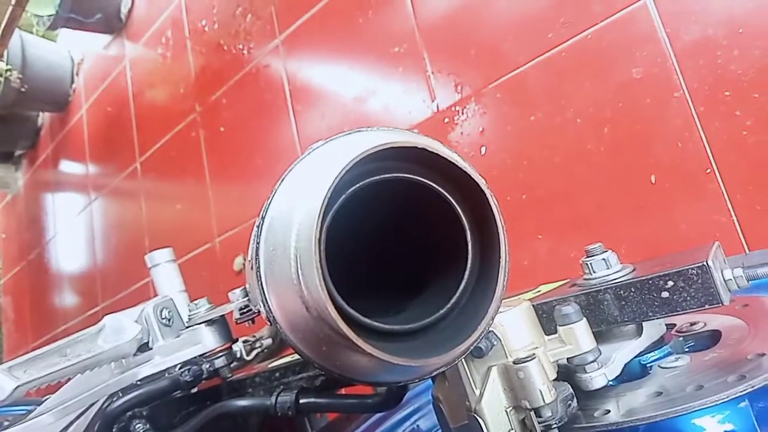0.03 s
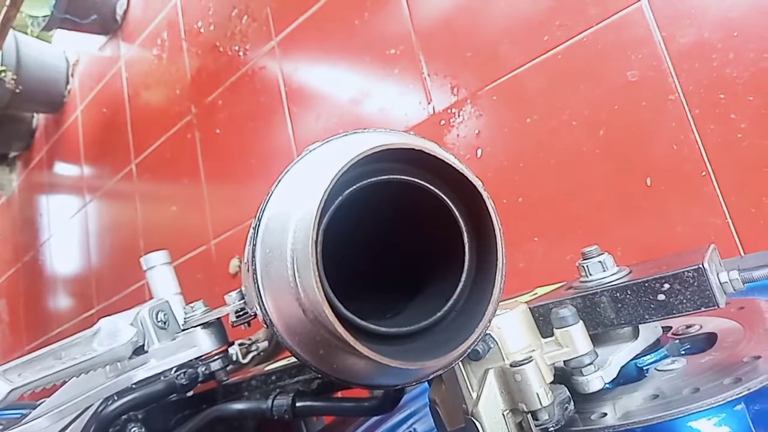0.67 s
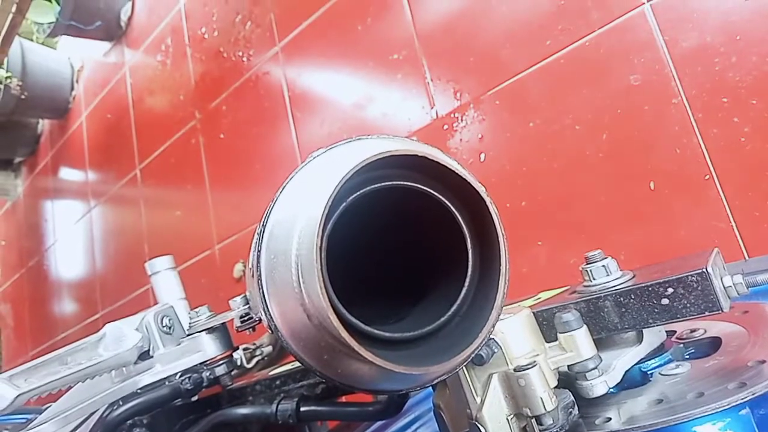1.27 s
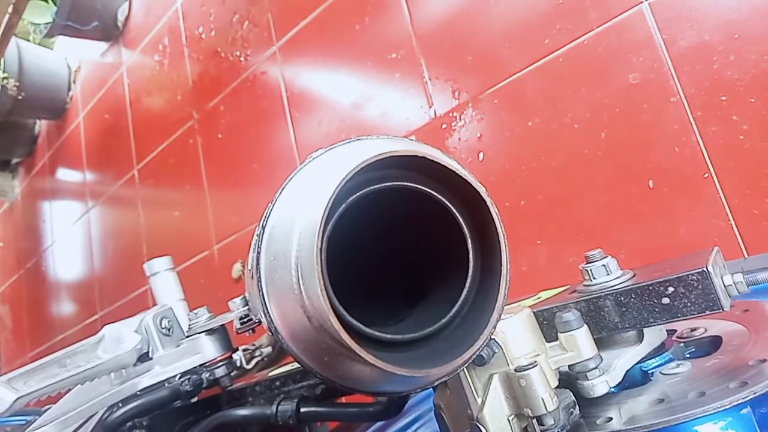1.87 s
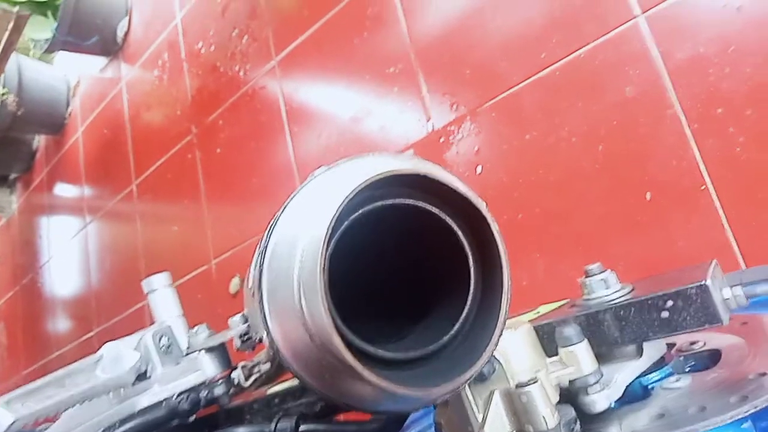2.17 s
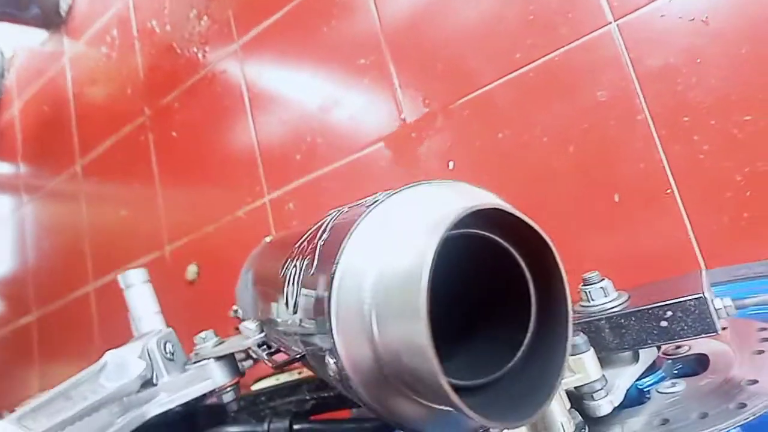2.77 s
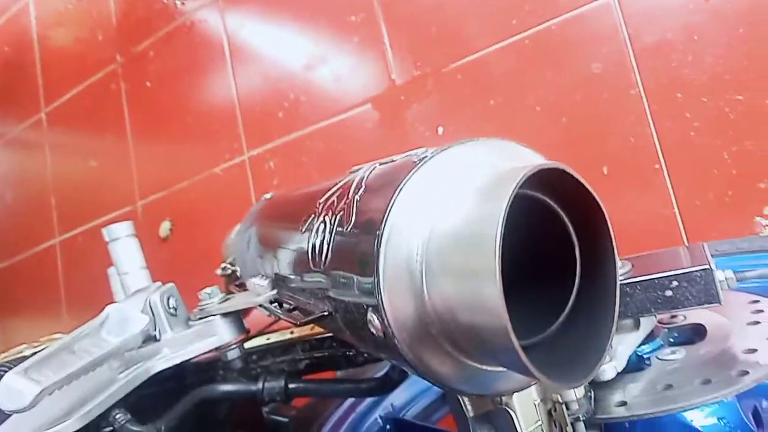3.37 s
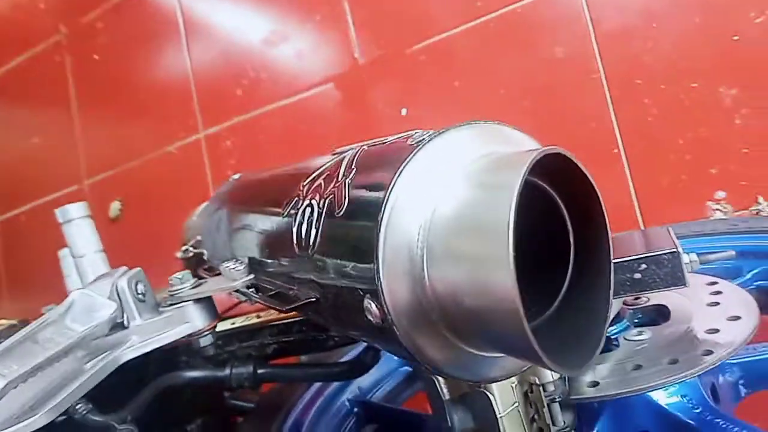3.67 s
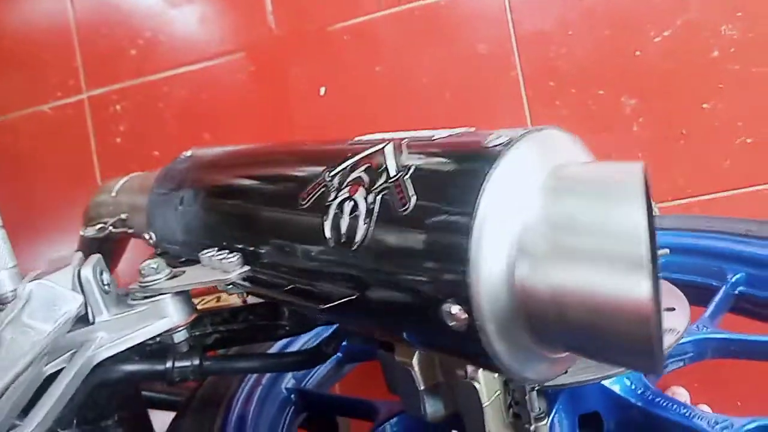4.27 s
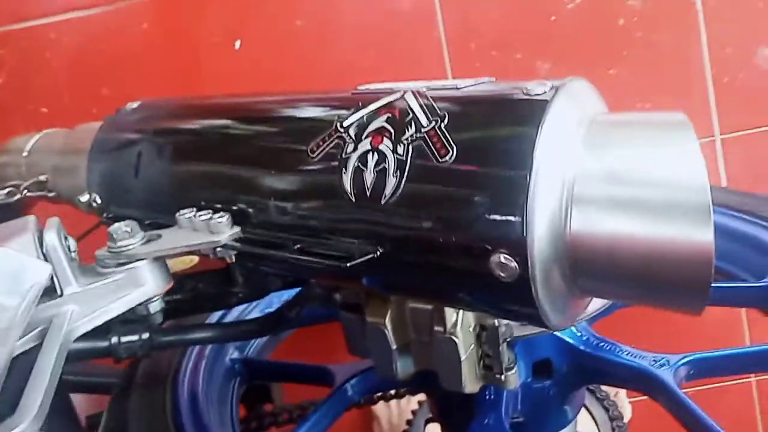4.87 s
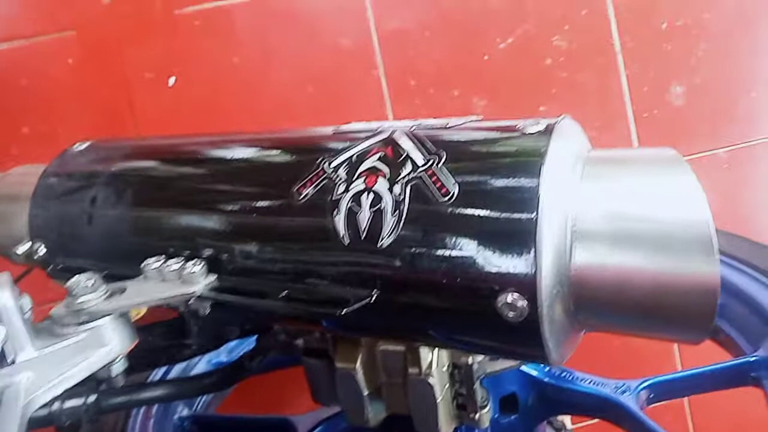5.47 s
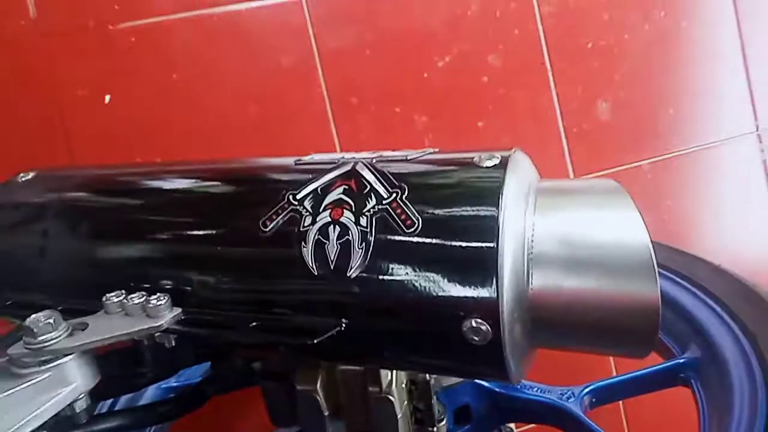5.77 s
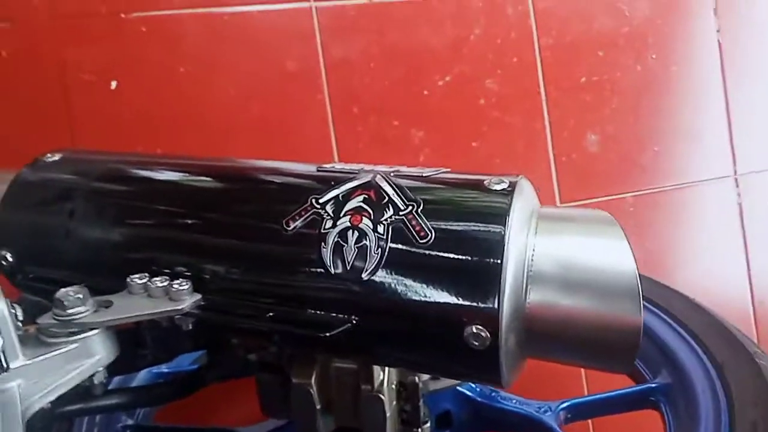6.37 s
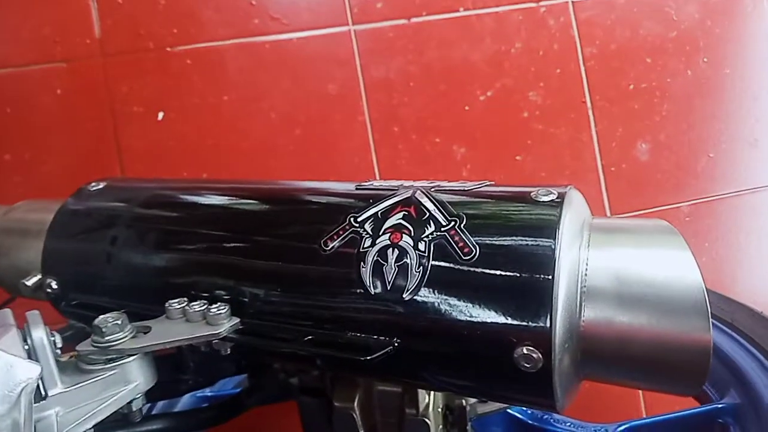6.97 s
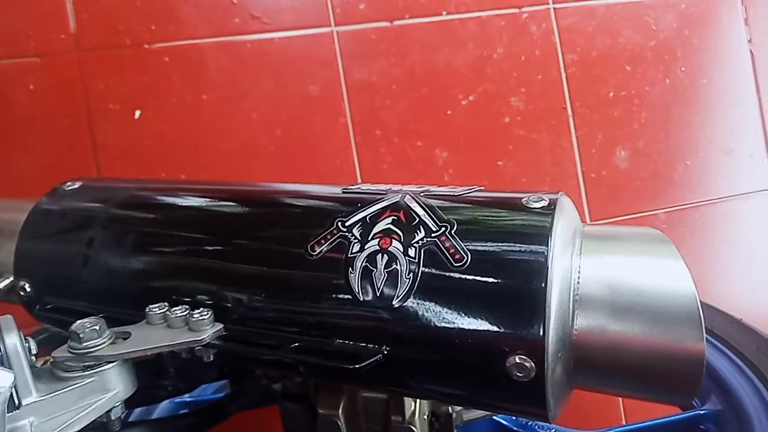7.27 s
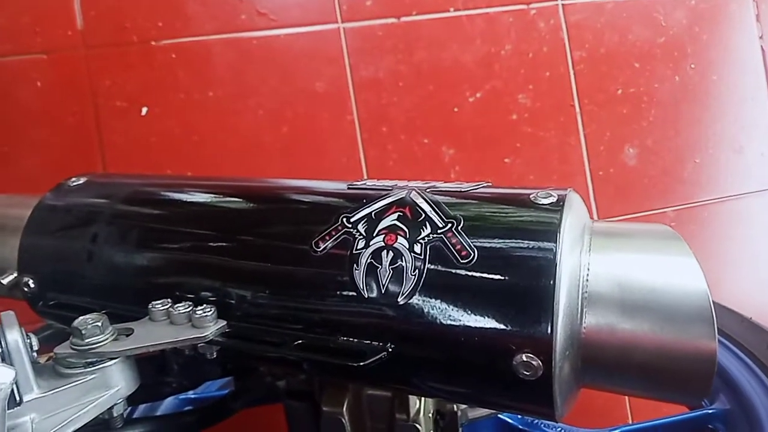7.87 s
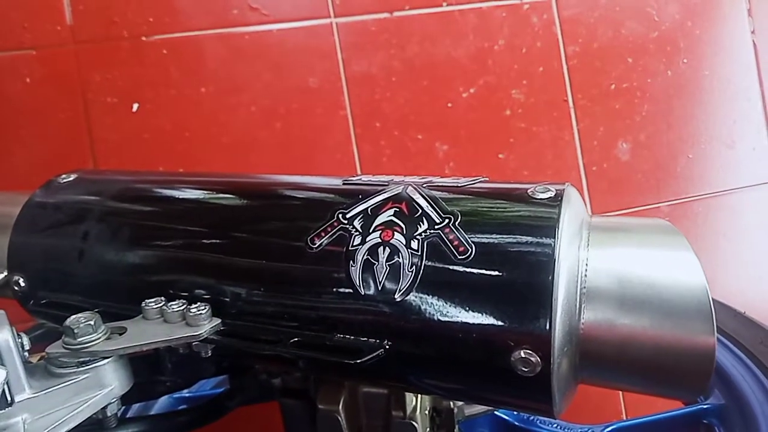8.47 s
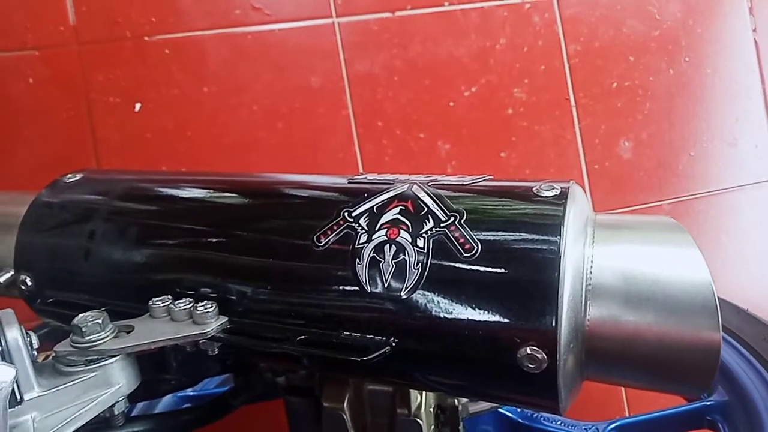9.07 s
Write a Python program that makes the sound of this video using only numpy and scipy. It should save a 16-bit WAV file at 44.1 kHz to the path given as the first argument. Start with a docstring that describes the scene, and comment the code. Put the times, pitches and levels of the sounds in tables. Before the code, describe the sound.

Close to the muffler, an idling motorcycle engine burbles and pops in a lumpy rhythm over faint mechanical ticking.

```python
"""A single-cylinder four-stroke motorcycle idles on a tiled floor, a phone close to the muffler's mouth.
From the start mostly every second cycle fires: a firing blows a hard pulse into the pipe, a miss sucks
a softer one back; gas cracks at the outlet and the valve gear ticks and whirs. From about 2 to 4 s the
microphone crosses the jet and puffs strike it. Between 4 and 5 s the engine briefly catches on every
cycle, with a few faint squeaks. By 6 s the phone is beside the muffler, where the crack is duller."""
import sys
import numpy as np
from scipy import signal
from scipy.fft import rfft, irfft, next_fast_len
from scipy.io import wavfile

SR = 44100
rng = np.random.default_rng(int(sys.argv[2]) if len(sys.argv) > 2 else 0)


def file_out(sig):
    """Save sig as 16-bit WAV at sys.argv[1]."""
    # one column per channel
    cols = np.atleast_2d(sig).T
    # limit, then scale
    lim = np.clip(cols, -1, 1)
    pcm = np.round(lim * 32767).astype(np.int16)
    wavfile.write(sys.argv[1], SR, pcm)


N = 402633
TIME = np.arange(N) / SR
FFT_SIZE = next_fast_len(N + SR)
HZ = np.arange(FFT_SIZE // 2 + 1) * SR / FFT_SIZE


def undb(db):
    """Decibels to gain."""
    return 10 ** (np.asarray(db) / 20)


def unit(x):
    """Scale to rms 1."""
    return x / np.sqrt(np.mean(x ** 2))


def shaped(x, response):
    """Filter by a frequency response."""
    return irfft(rfft(x, FFT_SIZE) * response, FFT_SIZE)[:N]


def band(hz, width, axis=HZ):
    """Response of one resonance, gain 1 at its centre."""
    return 1j * axis * width / (hz ** 2 - axis ** 2 + 1j * axis * width)


def low(hz, axis=HZ):
    """Response of a one-pole low-pass."""
    return 1 / (1 + 1j * axis / hz)


def noise(response):
    """Filtered noise of rms 1."""
    return unit(shaped(rng.standard_normal(N), response))


def coloured(points):
    """Noise of rms 1 with the colour of (Hz, dB) points."""
    hz, db = np.transpose(points)
    return noise(undb(np.interp(np.log(HZ + 1), np.log(hz), db)))


def bumps(times, sizes, width_s):
    """A bell-shaped push at each time."""
    out = np.zeros(N)
    for t, size, width in np.broadcast(times, sizes, width_s):
        near = slice(*np.searchsorted(TIME, [t - 5 * width, t + 5 * width]))
        out[near] += size * np.exp(-.5 * ((TIME[near] - t) / width) ** 2)
    return out


def scatter(times, spread_db):
    """A chance gain for each event."""
    return undb(spread_db * rng.standard_normal(len(times)))


# The idle hunts in quick surges and slow sags. Each row: time in seconds, crank speed in rpm.
IDLE_SPEED = [(0.0, 1476.0), (0.6, 1420.0), (0.84, 1556.0), (1.67, 1445.0), (2.3, 1451.0), (2.67, 1572.0),
              (2.83, 1490.0), (3.68, 1497.0), (3.82, 1538.0), (4.38, 1458.0), (4.45, 1540.0), (5.0, 1452.0),
              (5.07, 1518.0), (5.58, 1434.0), (5.81, 1497.0), (7.07, 1447.0), (7.19, 1548.0), (7.9, 1433.0),
              (8.03, 1557.0), (8.53, 1433.0), (8.79, 1524.0), (9.13, 1375.0)]
# Spells in which the engine catches on every cycle. Each row: start and end in seconds.
CATCHES = [(4.2, 4.28), (4.45, 4.92)]

def engine_cycles(first_s=.048):
    """One cycle per two crank turns: its time, its rpm above the mean, and whether it fires."""
    rpm = np.interp(TIME, *np.transpose(IDLE_SPEED))
    phase = np.cumsum(rpm / 60 / 2) / SR
    phase -= np.interp(first_s, TIME, phase)
    times = np.interp(np.arange(int(phase[-1]) + 1), phase, TIME)
    fires = [False]
    for t in times[1:]:
        fires.append(not fires[-1] or any(start < t < end for start, end in CATCHES))
    return times, np.interp(times, TIME, rpm - rpm.mean()), np.array(fires)


# The gas crack swells and eases. Each row: time in seconds, relative level in dB.
CRACK_LEVEL = [(0, .7), (.8, 2), (.95, 5.5), (3.2, 4), (3.9, 6.5), (4.3, 2.1), (5.3, 3.2), (6, 1),
               (9.13, 0.8)]

def firings(times, surge_rpm, fires, db_per_rpm=0.0085, refire_db=-3.5):
    """A firing cracks harder with speed, and less right after another, when no unburnt charge is left."""
    db = np.interp(times, *np.transpose(CRACK_LEVEL)) + db_per_rpm * surge_rpm
    db += refire_db * np.roll(fires, 1)
    db += 0.23 * rng.standard_normal(len(times))
    return times[fires], undb(db[fires])


# Partial burns leave less vacuum and weaken the gulp. Each row: time in seconds, change in dB.
PARTIAL_BURNS = [(.05, -15), (.21, -13.5), (1.67, -2.7), (2.49, -4.5), (3.12, -4), (5.78, -3.5), (6.1, -5),
                 (6.75, -2.5), (6.92, -3.1), (7.24, -8), (7.56, -6.5), (7.89, -2.5), (9.02, -3.8)]

def misfires(times, surge_rpm, fires, lead_s=.0033, base_db=1, db_per_rpm=0.0266):
    """An unfired cycle gulps a little ahead of the beat, harder the faster the engine turns."""
    missed = times[~fires] - lead_s
    db = base_db + db_per_rpm * surge_rpm[~fires]
    for t, change_db in PARTIAL_BURNS:
        db[np.argmin(abs(missed - t))] += change_db
    return missed, undb(db)


# Resonances of header and muffler. Each row: frequency in Hz, width in Hz, gain in dB, polarity.
PIPE_MODES = [(92.8, 18.7, 4, -1), (165.9, 33.5, 6.5, -1), (194.3, 12.2, 4, 1), (280.6, 52.8, 2.5, -1),
              (352.7, 12.8, 5.5, 1), (564, 8.5, -10.5, 1), (716, 67, -2, -1)]

def exhaust(fired, missed, miss_gain, mouth_hz=105):
    """Pressure pulses at the valve ring the pipe; its open end radiates no deep bass."""
    blowdown = bumps(fired, scatter(fired, 0.5), width_s=0.00063 * scatter(fired, 0.35))
    # an unfired cylinder is below air pressure: it gulps gas back, then the piston pushes it out again
    gulp = bumps(missed, .5 * miss_gain, width_s=0.0008)
    push = bumps(missed + .0176, 0.26 * np.sqrt(miss_gain) * scatter(missed, 2), width_s=0.0026)
    # the flow is turbulent for the rest of the stroke
    stroke = bumps(np.r_[fired, missed] + 0.018, 0.74, width_s=0.01)
    eddies = undb(-25.5) * stroke * noise(low(hz=437) ** 2)
    flow = shaped(blowdown - gulp + push + eddies, low(hz=263))
    pipe = sum(np.sign(sign) * undb(db) * band(hz, width) for hz, width, db, sign in PIPE_MODES)
    pipe -= undb(-3.5) * low(hz=182)
    mouth = band(mouth_hz, mouth_hz) * 1j * HZ / mouth_hz
    return undb(4.3) * shaped(flow, pipe * mouth)


def gargle(missed, miss_gain, refired, muffler_hz=410):
    """The flow flutters as it reverses after a gulp or a hurried second firing: a throaty after-ring."""
    times = np.r_[missed + .0222, refired + .0225]
    sizes = np.r_[np.sqrt(miss_gain), np.full(len(refired), undb(-1.5))]
    jitter_s = .0007 * rng.standard_normal(len(times))
    kicks = bumps(times + jitter_s, sizes * scatter(times, 2), width_s=.0004)
    throat = band(hz=340.5, width=26) + undb(-7) * band(370.6, 19) + undb(-8) * band(228, 37)
    muffler = 1 / (1 + (HZ / muffler_hz) ** 12)
    return undb(1) * shaped(kicks, throat * muffler)


# Colour of the turbulent gas at the outlet. Each row: frequency in Hz, relative level in dB.
CRACK_COLOUR = [(300, 1.5), (650, 15.5), (900, -3.5), (1600, 2.5), (2800, -7.5), (3500, -4), (4400, -10.5),
                (5300, -23.5), (6400, -18.5), (7600, -31.5), (8500, -26.5), (9600, -41), (12000, -35),
                (15000, -33)]
# Colour of the snap of the pulse's steep front. Each row: frequency in Hz, relative level in dB.
SNAP_COLOUR = [(500, -2), (1500, 1), (3500, 0), (4400, -5.5), (5300, -17), (6400, -8), (7600, -20.5),
               (8500, -18.5), (9600, -27), (12000, -25), (15000, -24)]
# The microphone's way round the muffler. Each row: time in seconds, angle to the jet in quarter turns
# (0 is straight in front of the mouth, 1 is beside the muffler).
MIC_ANGLE = [(0, -0.18), (2.2, -0.44), (3.0, 0.061), (3.7, 0.54), (4.4, 0.4), (6, 0.92), (9.13, 0.89)]

def gas_crack(fired, force, missed, miss_gain):
    """Gas snaps and rasps as the pulse leaves, and rasps again after its round trip; a gulp hisses."""
    jet = bumps(fired - .0003, 0.71 * force, width_s=0.0014)
    jet += bumps(fired + 0.0047, 0.58 * force, width_s=0.0017)
    front = bumps(fired - .0004, 0.33 * force * scatter(fired, 1.8), width_s=.0006)
    gulp = bumps(missed + 0.002, 0.22 * miss_gain ** 2, width_s=0.005)
    turbulence = coloured(CRACK_COLOUR)
    rasp = turbulence * jet + coloured(SNAP_COLOUR) * front + shaped(turbulence * gulp, low(hz=7000))
    # the treble beams straight out of the mouth
    off_axis = abs(mic_angle())
    return undb(-28.5) * ((1 - off_axis) * rasp + off_axis * shaped(rasp, abs(low(hz=3400))))


def mic_angle():
    """The microphone's angle to the jet at every sample."""
    return np.interp(TIME, *np.transpose(MIC_ANGLE))


# Mechanical noise at the microphone. Each row: time in seconds, gain in dB.
MACHINE_LEVEL = [(0, -50), (1.9, -51.5), (4.1, -53.5), (4.9, -53), (7.2, -50.5), (8, -51), (9.13, -50)]
# The whir from behind the motorcycle and from its side. Each row: frequency in Hz, relative level in dB.
WHIR_BEHIND = [(30, -1), (200, 7), (500, 1.5), (850, -8), (1100, 4.5), (1350, -5), (1750, -10.5),
               (2200, -2.5), (2900, -10.5), (3400, -10.5), (4300, -19.5), (5200, -35), (8000, -42),
               (15000, -51.5)]
WHIR_BESIDE = [(30, -1.5), (200, 8.5), (500, -1), (850, -6.5), (1030, -1.5), (1250, -6), (1650, -1.5),
               (2400, -2.5), (2900, -10.5), (3400, -9.5), (4300, -17.5), (5200, -32.5), (8000, -35.5),
               (15000, -52)]
# Ringing of engine cases and muffler shell. Each row: frequency in Hz, width in Hz, gain in dB.
SHELL_MODES = [(1017, 66, 0), (1240, 34, -8), (1320, 47, -8), (1580, 110, -1), (2030, 12, -9),
               (2490, 25, -9), (3750, 96, -9.5), (6700, 180, 0)]

def machinery(fired, missed):
    """Cam chain and gears whir through the cases; the valve gear ticks at set points of every cycle."""
    side = np.clip(mic_angle() + 0.18, 0, 1)
    whir = np.sqrt(1 - side) * coloured(WHIR_BEHIND) + np.sqrt(side) * coloured(WHIR_BESIDE)
    beats = np.r_[fired, missed]
    # the exhaust valve knocks hardest when it opens against burnt gas
    ticks = bumps(fired - .0033, 2.4 * scatter(fired, 1), width_s=0.0028)
    ticks += bumps(beats - .013, 0.85 * scatter(beats, 2.5), width_s=0.003)
    ticks += bumps(beats + 0.043, 0.3 * scatter(beats, 7.5), width_s=0.0034)
    tappets = coloured([(300, -13.5), (700, -1), (1300, 0), (2200, -3), (4200, -24), (5200, -38.5),
                        (15000, -59.5)])
    waver = undb(noise(low(hz=25) ** 2))
    cases = 1 + sum(undb(db) * band(hz, width) for hz, width, db in SHELL_MODES)
    level = undb(np.interp(TIME, *np.transpose(MACHINE_LEVEL)))
    return level * shaped(undb(3.5) * whir * waver + undb(-0.5) * ticks * tappets, cases)


def puff(db, hz, rise_s=.0018, fall_s=.0045):
    """A ring of gas snaps on the microphone, then swirls away; the hit lies at the middle sample."""
    size, force = 4096, undb(db)
    age = (np.arange(size) - size // 2) / SR
    axis = np.arange(size // 2 + 1) * SR / size
    edge = -np.sign(age) * np.exp(-abs(age) * np.pi * hz)
    snap = irfft(rfft(edge) * abs(low(1.2 * hz, axis)) ** 2 / (1 + (axis / 3800) ** 4))
    eddy_colour = band(0.6 * hz, 0.9 * hz, axis) ** 2 * low(1900, axis) ** 3
    eddy = unit(irfft(rfft(rng.standard_normal(size)) * eddy_colour))
    swirl = eddy * np.exp(np.where(age < 0, -.5 * (age / rise_s) ** 2, -age / fall_s))
    return 1.62 * force ** 1.6 * snap / snap.max() + 0.55 * force / (1 + 2 * force) * swirl


# Puffs that hit the microphone squarely. Each row: time in seconds, strength in dB, bandwidth in Hz.
DIRECT_PUFFS = [(1.943, -17, 750), (2.443, -16.5, 660), (2.746, -16, 1010), (3.072, -14, 970),
                (3.399, -20.5, 1200), (3.547, -9.5, 687), (3.5516, -3.5, 1260), (3.7155, -15.5, 1210),
                (3.723, -9.5, 770), (3.873, -15, 1190), (3.88, -12.5, 750)]

def jet_puffs(fired, from_s=2.2, to_s=3.6, lag_s=.027, soft_db=-23, soft_hz=810):
    """Soft puffs follow the firings while the microphone crosses the jet; others hit it squarely."""
    soft = [(t + lag_s, soft_db, soft_hz) for t in fired if from_s < t < to_s]
    out = np.zeros(N)
    for t, db, hz in list(DIRECT_PUFFS) + soft:
        sound = puff(db, hz)
        start = int(t * SR) - len(sound) // 2
        out[start:start + len(sound)] += sound
    return out


def block_drone():
    """The shaking engine block drones under the pulses."""
    return undb(-41) * coloured([(20, -3), (45, -21), (90, 2.5), (180, -2), (350, -4.5), (500, -19.5),
                                 (1000, -41.5), (4000, -73)])


# Squeaks behind the engine. Each row: start in seconds, length in seconds, pitch in Hz, gain in dB.
SQUEAKS = [(.66, 0.099, 4200, -56), (4.30, 0.084, 3460, -44), (4.30, 0.13, 4170, -54.5),
           (4.46, 0.079, 4300, -49.5)]

def squeaks():
    """Narrow bands of noise swell and fade as faint, raspy high squeaks."""
    out = np.zeros(N)
    for start, length, hz, db in SQUEAKS:
        swell = bumps(start + length / 2, 0.6, width_s=length / 3)
        out += undb(db) * swell * noise(band(hz, width=310) ** 2)
    return out


def valve_ring(times):
    """The closing valve adds a faint, high metallic tick to every cycle."""
    ring = noise(band(hz=11900, width=700) ** 2)
    return undb(-82) * ring * bumps(times + .03, scatter(times, 2), width_s=0.0036)


def room(x, t60_s, wet_db):
    """The tiled room answers with a short diffuse tail, thin in the bass."""
    tail = rng.standard_normal(N) * np.exp(-np.log(1000) * TIME / t60_s) * (TIME > .006)
    response = rfft(tail / np.linalg.norm(tail), FFT_SIZE) * (1 - low(hz=304)) ** 2
    return x + undb(wet_db) * shaped(x, response)


def scene():
    """One train of engine cycles drives the pipe, the gas and the valve gear, heard in mono."""
    times, surge_rpm, fires = engine_cycles()
    fired, crack_gain = firings(times, surge_rpm, fires)
    missed, miss_gain = misfires(times, surge_rpm, fires)
    refired = times[fires & np.roll(fires, 1)]
    pulses = exhaust(fired, missed, miss_gain) + gargle(missed, miss_gain, refired)
    boom = room(pulses, t60_s=0.44, wet_db=-8.5)
    crack = room(gas_crack(fired, crack_gain, missed, miss_gain), t60_s=0.54, wet_db=-12)
    engine = block_drone() + machinery(fired, missed) + valve_ring(times)
    return (boom + crack + engine + jet_puffs(fired) + squeaks())[None]


def record(dry, bass_hz=58, top_hz=15500):
    """The phone drops the deepest bass, rounds the loudest peaks and cuts the top."""
    bass_cut = .15 + .85 * HZ ** 4 / np.sqrt(HZ ** 8 + bass_hz ** 8)
    thin = shaped(dry[0], bass_cut)[None]
    rounded = thin / (1 + thin ** 12) ** (1 / 12)
    return signal.sosfilt(signal.ellip(8, .2, 70, top_hz, fs=SR, output="sos"), rounded)


dry = scene()
out = record(dry)
file_out(out)
```